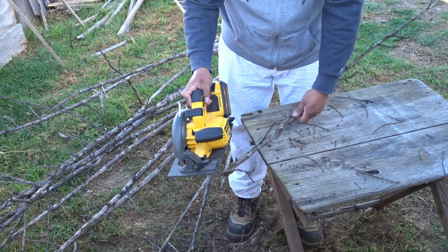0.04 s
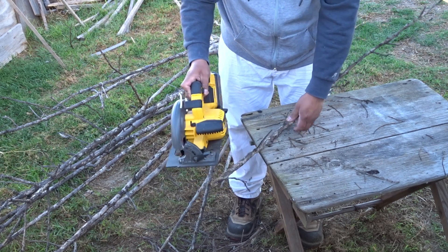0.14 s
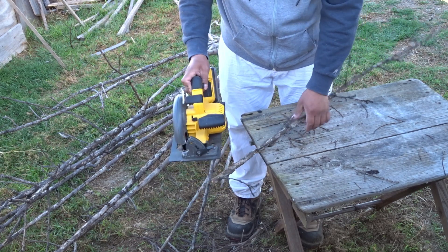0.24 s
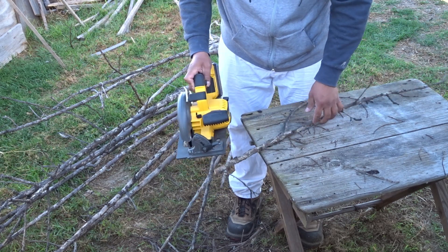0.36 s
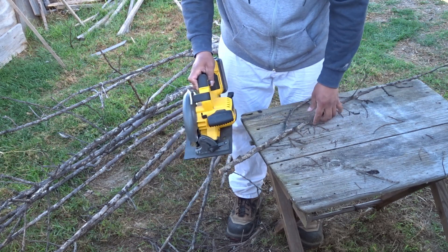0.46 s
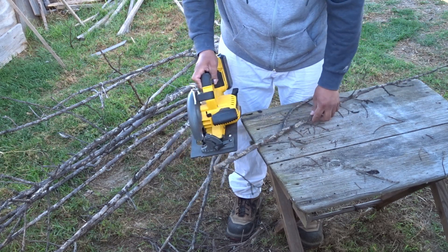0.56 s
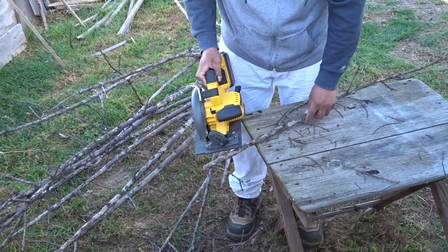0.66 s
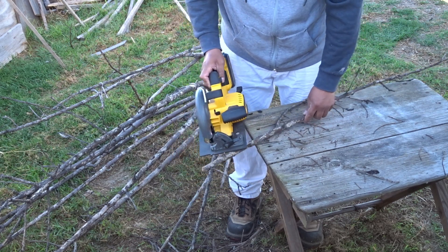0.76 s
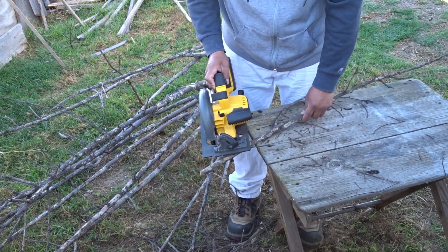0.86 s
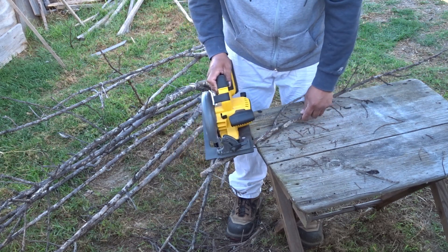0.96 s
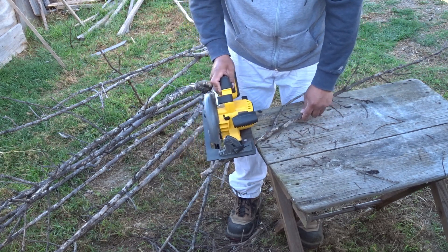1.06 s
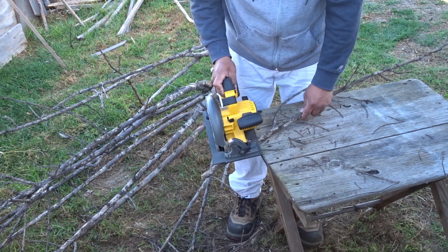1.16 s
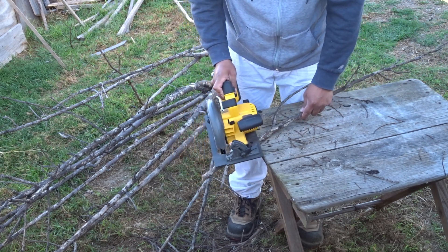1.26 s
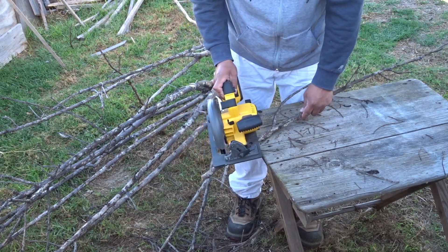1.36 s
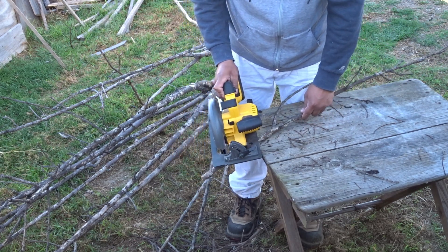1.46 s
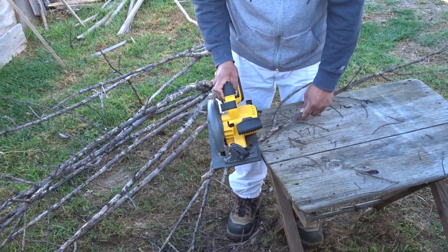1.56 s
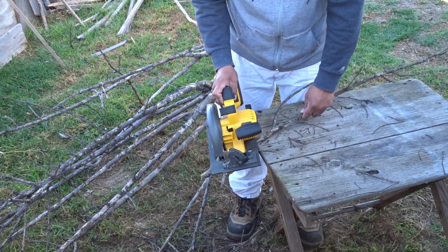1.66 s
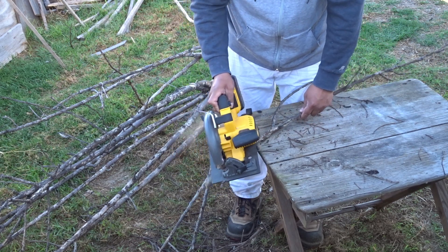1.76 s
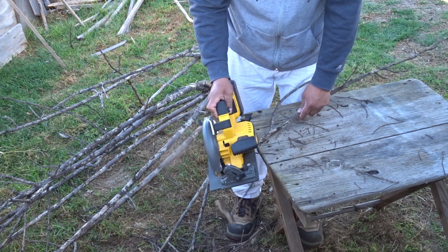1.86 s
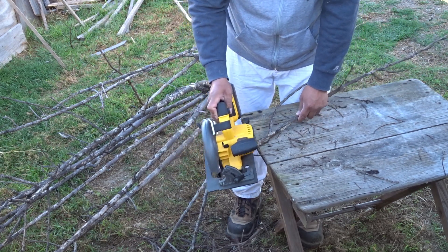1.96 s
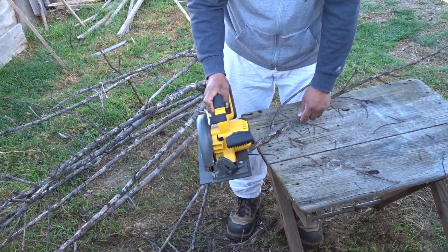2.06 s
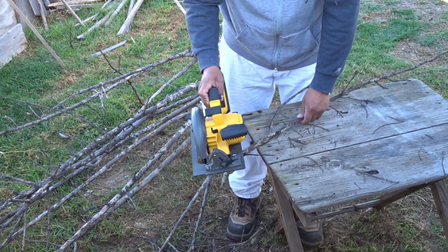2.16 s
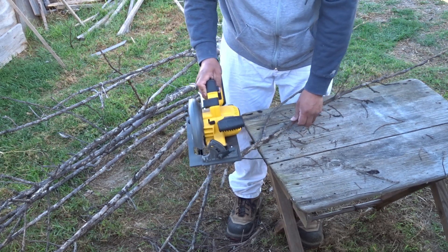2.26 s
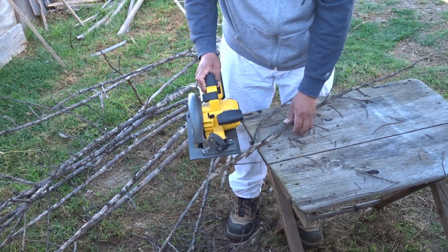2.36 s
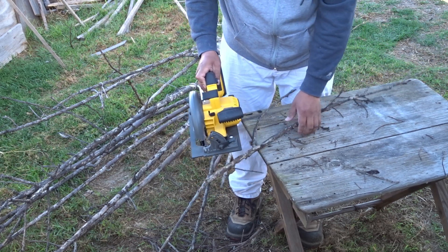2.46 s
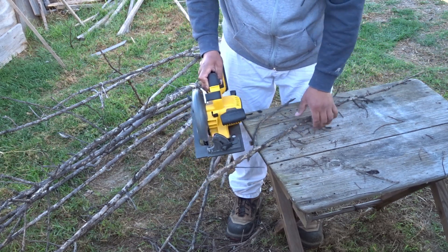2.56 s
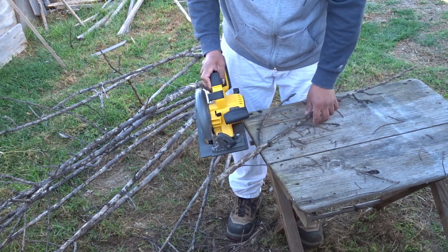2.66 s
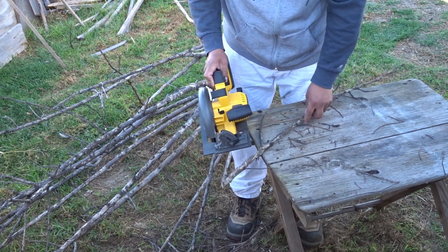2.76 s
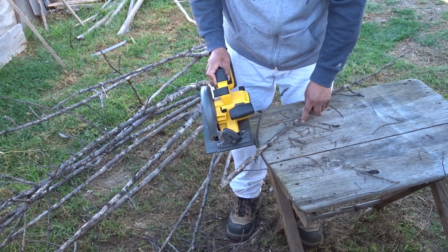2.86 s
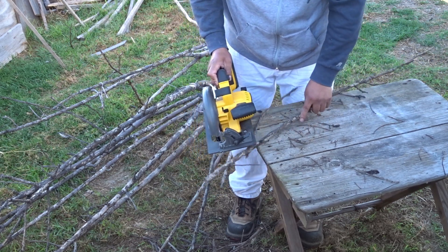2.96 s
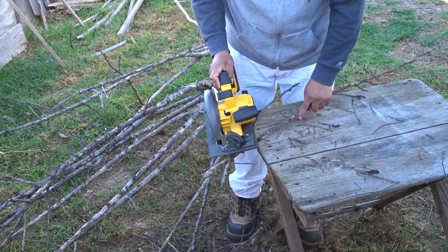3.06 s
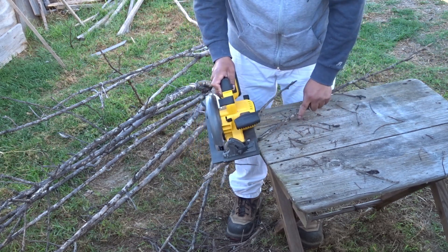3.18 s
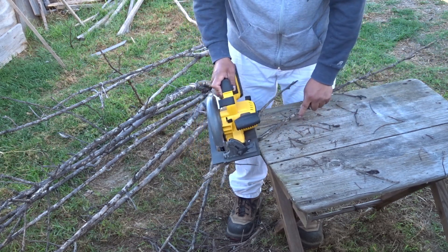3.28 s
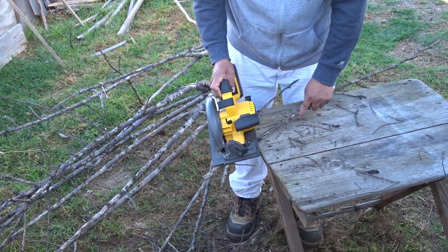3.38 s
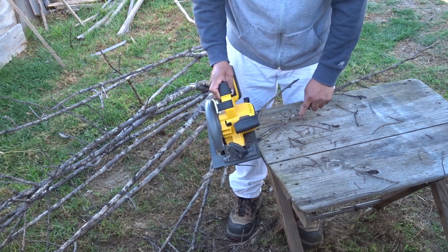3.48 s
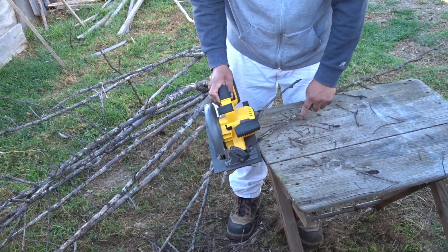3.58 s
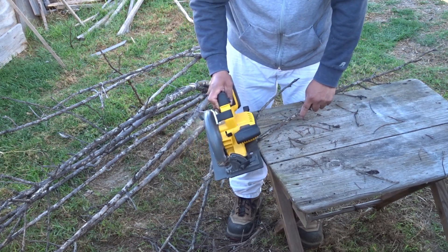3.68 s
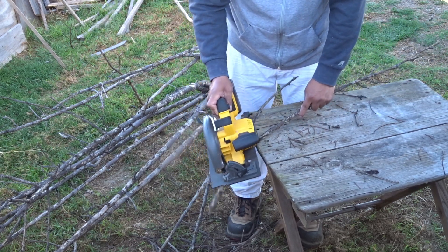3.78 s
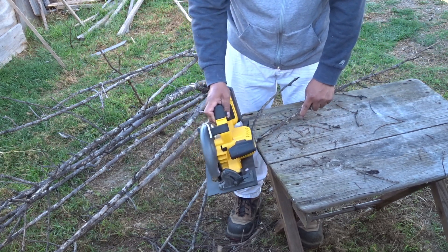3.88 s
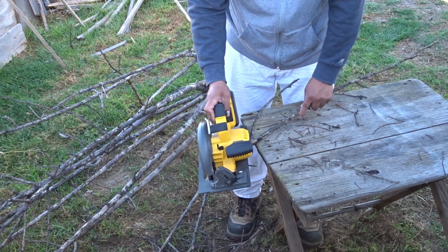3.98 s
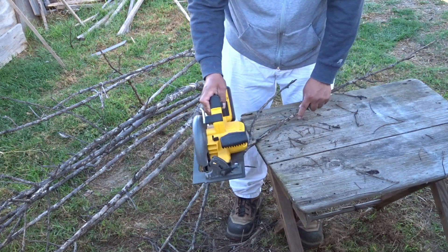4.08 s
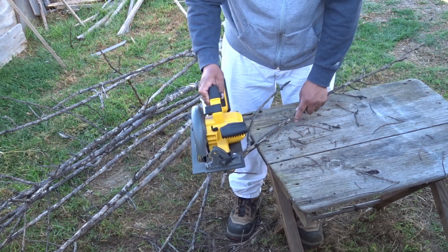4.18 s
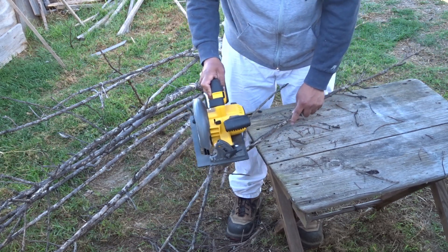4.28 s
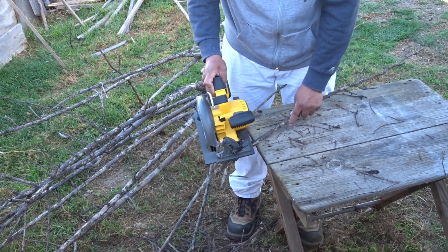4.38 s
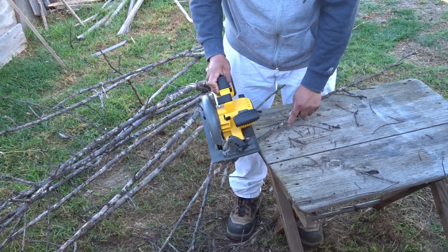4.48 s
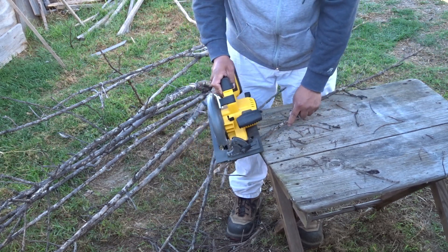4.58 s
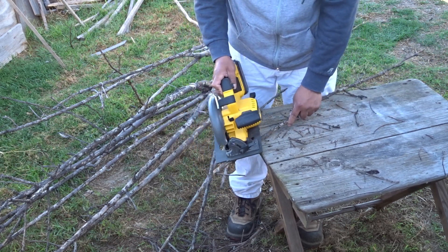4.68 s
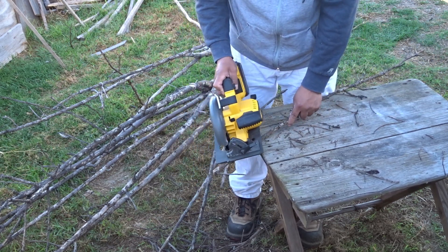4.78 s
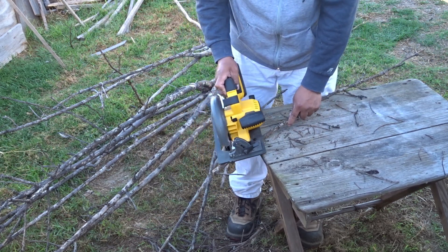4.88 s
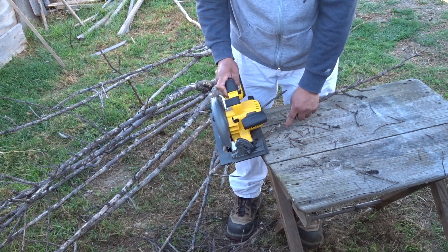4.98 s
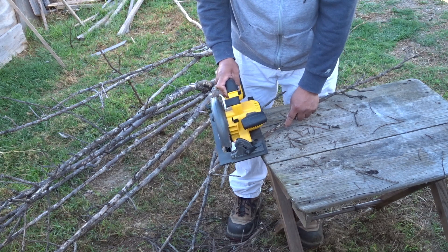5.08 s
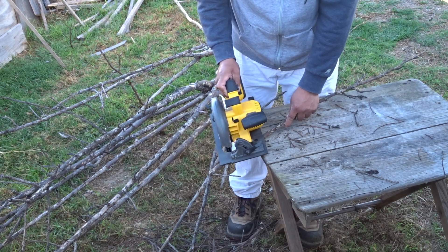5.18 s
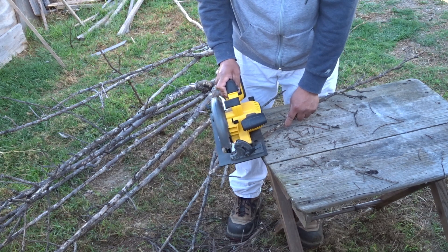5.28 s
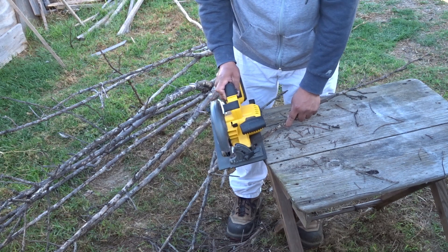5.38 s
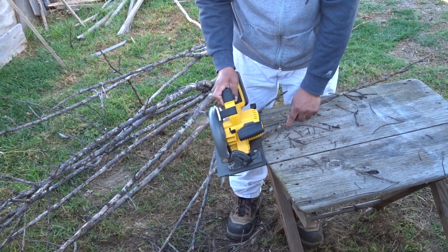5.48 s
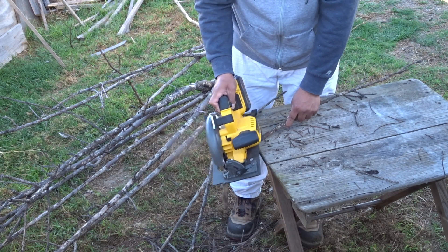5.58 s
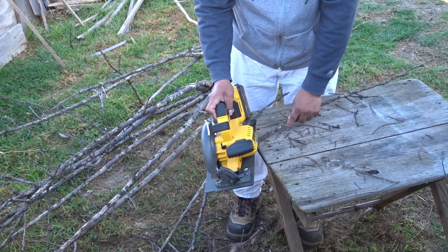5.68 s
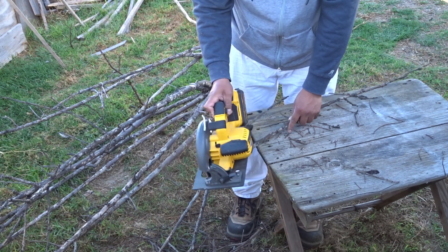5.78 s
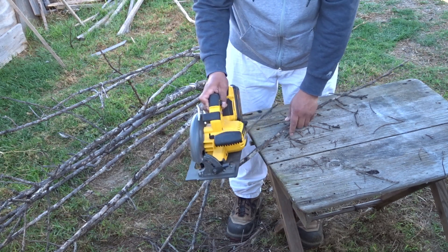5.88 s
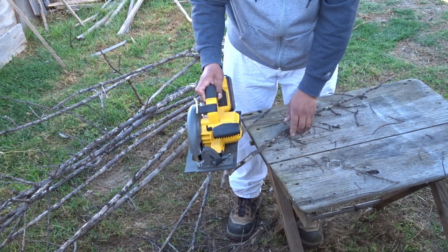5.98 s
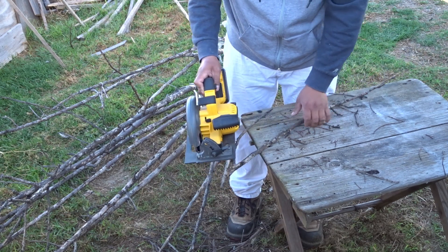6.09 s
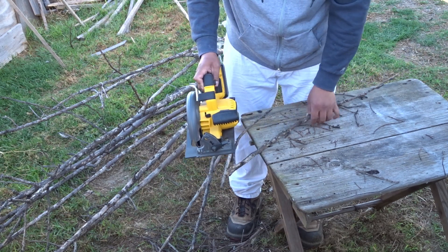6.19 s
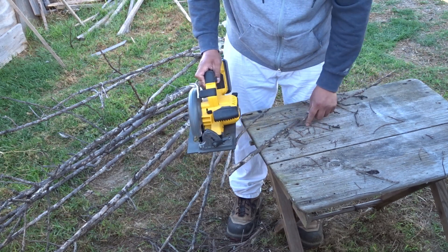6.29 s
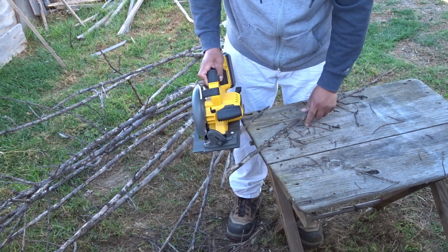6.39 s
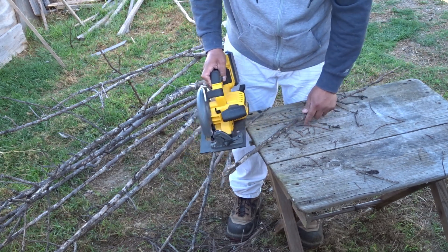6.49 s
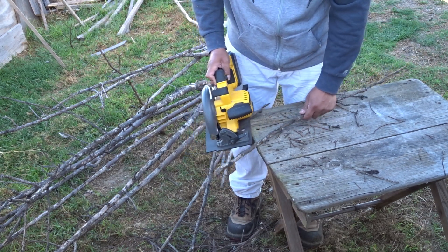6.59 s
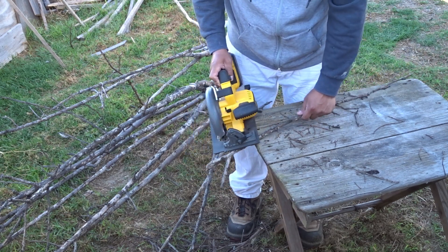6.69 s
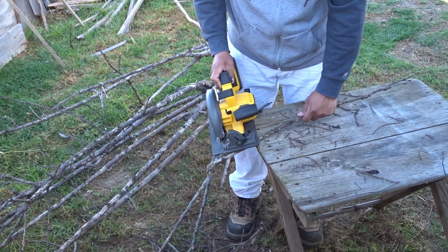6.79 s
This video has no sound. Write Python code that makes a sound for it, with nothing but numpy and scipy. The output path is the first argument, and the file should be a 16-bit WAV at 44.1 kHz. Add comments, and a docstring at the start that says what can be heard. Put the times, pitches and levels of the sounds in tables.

```python
"""A cordless circular saw whines down to a stop, and its steel blade rings on over a quiet garden. It runs up
three more times, each time nipping through a thin dry branch before the brake stops the motor. Fan and gears
whine through the housing, the gear train rattles, air rushes, teeth rasp briefly in the wood. Between runs
twigs snap, the branch is shoved over the table and squeaks once on the saw's metal guard, the switch clicks, a
distant flock chatters and one nearer bird whistles."""
import sys
import numpy as np
from scipy import signal
from scipy.fft import rfft, irfft
from scipy.io import wavfile
from scipy.ndimage import uniform_filter1d

SR = 44100
rng = np.random.default_rng(int(sys.argv[2]) if len(sys.argv) > 2 else 0)


def int16_out(signal):
    """Quantize to a 16-bit WAV file."""
    q = np.round(np.clip(np.atleast_2d(signal).T, -1, 1) * 32767)
    wavfile.write(sys.argv[1], SR, q.astype(np.int16))


N = 301644
TIME = np.arange(N) / SR

# runs of the saw, the first already braking as we come in: trigger_s, spin_up_time_constant_s, rest_s
SAW_RUNS = [(-.6, .28, .406), (1.503, .286, 2.48), (3.42, .279, 4.514), (5.199, .28, 6.315)]
# partials of the whine; near 13 is the fan, near multiples of 4 are the motor and its pinion:
# cycles_per_turn, powered_db, braking_db, loudest_shaft_hz, offset_for_6_db_drop_hz, gear_play_turns
WHINE_ORDERS = [(0.997, -4.5, 5.5, 517, 166, .002), (1.94, -31, -0.5, 574, 179, .002),
                (4.012, -15, -2, 350, 227.5, .0015), (8.03, 3, 0, 280, 69.5, 0.0011),
                (8.92, -5.5, -3.5, 203, 143.5, 0.005), (9.78, -14, -5.5, 340, 113, 0.0048),
                (11.96, -16.5, -6.5, 316, 158.5, .002), (13.03, -0.5, -0.5, 372, 152, 0.0005),
                (15.95, -10, -3.5, 226, 115.5, 0.0014), (18.05, -7, -12.5, 250, 132, .003),
                (20.16, -7.5, -16, 110, 110, .004), (26.4, -12, -11.5, 350, 108, .002),
                (27.53, -8.5, -10, 200, 109, 0.0026)]
# how well the housing radiates the whine: frequency_hz, gain_db
HOUSING_EQ = [(200, -51.5), (420, -27), (800, -11.5), (1250, -9), (1520, 4), (1920, -3), (2120, 10),
              (2480, 8.5), (2680, 2.5), (3150, 5), (3550, -1), (4050, 8.5), (4450, 2.5), (5400, 0),
              (6300, 0), (7300, 4.5), (10000, -8.5), (16000, -56)]
# tone of the gear rattle: frequency_hz, gain_db
RATTLE_EQ = [(18, -86), (30, -50.5), (276, -45), (455, -33.5), (577, -16), (1120, -9), (1420, -6.5),
             (1890, -2), (2220, 0.5), (3300, -11.5), (4650, -9), (5300, -19), (8990, -37.5), (9990, -22.5),
             (16500, -76)]
# tone of the rushing air: frequency_hz, gain_db
AIR_EQ = [(18, -78), (30, -27), (314, -31), (409, -31), (455, -24.5), (732, -29.5), (814, -12.5),
          (1270, -16), (1530, -4), (1890, -3.5), (2100, 0), (2740, -0.5), (3970, 2.5), (8310, -9),
          (16500, -36.5)]
# resonances of the spinning blade: pitch_hz, width_hz, level_db
SINGING_MODES = [(1355, 10, -4), (1650, 50, -3), (2572, 10, 3), (2637, 16, 1), (2899, 40, -2),
                 (3988, 16, -3), (6483, 16, -12), (7164, 50, -13), (8084, 14, -16), (8273, 22, -13),
                 (8741, 22, -14)]
# housing resonance where the gears grind under starting load: pitch_hz, width_hz, level_db
GRIND_MODES = [(2300, 100, -11)]
# speeds where the gears hit a housing resonance: shaft_hz, half_width_hz, powered_db, braking_db
GEAR_FLARES = [(138, 7.4, 3.5, 5), (169, 8.8, 2.5, 1), (259, 24, 5, 3.5), (299.5, 27.5, 3.5, 3)]
# tone of the open air: frequency_hz, gain_db
GARDEN_EQ = [(30, -31), (200, -35), (400, -21.5), (650, -9.5), (1000, -10), (1500, -6.5), (2500, -10),
             (3500, -2), (4500, -10), (6300, -23), (10000, -36), (16000, -51)]
# modes of the resting blade: pitch_hz, t60_s, twin_gain, stop_1_db, stop_2_db, stop_3_db, stop_4_db
BLADE_MODES = [(119, 4, .1, -89, -76, -86, -89), (1182, 3.1, 0.27, -55.5, -50.5, -104, -57),
               (1402, 3.6, .2, -77, -53, -56, -57), (1465, 6.8, 1, -51.5, -58.5, -59.5, -55),
               (1800, 0.81, .3, -44.5, -40.5, -57, -64), (2098, 7.6, 0.058, -57, -37.5, -50, -49.5),
               (3090, 4.3, 0.36, -40.5, -48.5, -44, -51.5), (3305, 3.1, 0.34, -65.5, -48, -63, -47),
               (3765, 3.3, 0.76, -52, -35.5, -50, -47.5), (3947, 2.5, 0.15, -46, -46.5, -52, -50.5),
               (4960, 1.9, 0.38, -55, -60.5, -49.5, -51), (6680, 0.56, 0.36, -52.5, -52, -56, -56),
               (2412, 1.5, .3, -54, -58, -64, -47), (8100, .7, .4, -72, -63, -72, -69)]
# tone of cracking dry wood: frequency_hz, gain_db
CRACK_EQ = [(100, -66), (350, -11), (1200, -5), (2500, -1.5), (4000, 3.5), (7000, -6), (10000, -11),
            (16000, -34)]
# twigs snapping: start_s, peak_db, t60_s
TWIG_SNAPS = [(.412, -29, .025), (.454, -29, .018), (2.682, -29, .022), (2.964, -31, .027),
              (5.004, -38, .029), (6.553, -30, .03), (6.626, -29, .04), (6.757, -30, .023),
              (2.604, -16, .024), (2.89, -14, .022)]
# short drags of the branch over the table: peak_s, level_db, t60_s
BRANCH_SHOVES = [(.87, -64, .3), (1.06, -63, .6), (1.35, -63, .4), (2.66, -40.5, 0.5), (2.76, -53, 0.49),
                 (2.98, -46.5, 0.35), (4.6, -53.5, 0.51), (6.62, -50.5, .7)]
# bouts of chatter from the flock: middle_s, half_length_s, level_db
FLOCK_BOUTS = [(1.047, 0.14, -52.5), (1.433, 0.15, -47.5), (3.174, 0.14, -49), (4.792, 0.11, -49.5),
               (6.8, 0.25, -56)]
# switch clicks and knocks of gears and guard: start_s, peak_db, crack_db, t60_s
SAW_KNOCKS = [(1.24, -29, -30, .07), (1.451, -20, -18, .03), (3.366, -19, -26, .035),
              (5.145, -23, -16, .03), (6.608, -26, -22, .06), (1.489, -20, -20, .06),
              (1.537, -17, -20, .035), (3.413, -22, -20, .04), (3.449, -20, -16, .04),
              (3.485, -16, -8, .035), (4.562, -10, 6, .028), (4.567, -13, -3, .026), (5.197, -23, -20, .04),
              (5.228, -10, -14, .03)]
# resonances of the knocked saw body: pitch_hz, width_hz, level_db
BODY_MODES = [(1620, 50, -4.5), (2310, 1140, 5.5), (3440, 590, -10.5), (4600, 230, -51), (6100, 710, -77)]
# resonances of the metal guard: pitch_hz, width_hz, level_db
GUARD_MODES = [(2180, 70, 0), (3630, 200, -12), (4330, 80, -5), (5700, 500, -17), (8040, 500, -19)]
# the blade passes through a branch: start_s, end_s, level_db
BRANCH_CUTS = [(1.734, 1.86, 2), (3.658, 3.768, 3.5), (5.455, 5.572, 0.5)]
# tone of the teeth tearing wood: frequency_hz, gain_db
RASP_EQ = [(200, -47), (480, -52), (600, -37.5), (720, -11), (1200, -15), (1700, -1.5), (2100, 0),
           (2600, 7.5), (3000, -4), (5000, 0), (8500, 0), (11000, -7), (16500, -21.5)]
# tones of the teeth striking wood: tooth_rate_multiple, level_db
TOOTH_TONES = [(1, -24.5), (2, -17.5), (3, -4)]
# distant surfaces return less bass and treble: frequency_hz, gain_db
ECHO_EQ = [(300, -2), (1000, 1.5), (4000, -6), (14000, -12.5)]
# stereo width, as the tone of the side signal: frequency_hz, gain_db
SIDE_EQ = [(60, -3.5), (250, -9), (500, -14.5), (1000, -14.5), (2200, -11), (4000, -7), (8000, -3.5),
           (13000, -7.5)]

FULL_HZ = 400  # shaft speed that counts as full speed


def undb(db):
    """Decibels to gain."""
    return 10 ** (np.asarray(db) / 20)


def unit(x):
    """Scale to rms 1."""
    return x / np.sqrt(np.mean(x ** 2) + 1e-18)


def noise():
    """White noise."""
    return rng.standard_normal(N)


def drift(rate_hz):
    """Random wander that glides to a new value rate_hz times a second."""
    return 1.6 * np.interp(TIME * rate_hz, np.arange(N), noise())


def gain_at(hz, eq):
    """Gain of an EQ curve at the given frequencies."""
    points_hz, db = np.transpose(eq)
    return undb(np.interp(np.log(hz + 1), np.log(points_hz), db))


def colour(x, eq):
    """Filter through an EQ curve."""
    size = 2 ** 19
    return irfft(rfft(x, size) * gain_at(np.fft.rfftfreq(size, 1 / SR), eq))[:N]


def resonate(x, modes):
    """Parallel resonances, each at its own rms level."""
    return sum(undb(db) * unit(signal.lfilter(*signal.iirpeak(hz, hz / width, SR), x))
               for hz, width, db in modes)


def grains(per_s, spread_db):
    """Random tiny impacts of uneven size."""
    hits = rng.random(N) < per_s / SR
    return unit(hits * noise() * undb(spread_db * np.clip(noise(), -2, 2)))


def fade(start, t60):
    """Gain 1 until the start time, then a steady decay."""
    return undb(-60 * np.maximum(TIME - start, 0) / t60)


def swell(peak, rise_s):
    """Gain that climbs 60 dB in the rise time and holds at 1 from the peak on."""
    return undb(-60 * np.maximum(peak - TIME, 0) / rise_s)


def burst(x, start, t60):
    """A fast-dying piece of x with peak 1; small things radiate no bass."""
    first = int(start * SR)
    piece = x[first:first + SR // 4]
    age = np.arange(len(piece)) / SR
    piece = piece * undb(-60 * age / t60) * np.minimum(age / .0005, 1)
    piece = signal.sosfilt(signal.butter(4, 750, "high", fs=SR, output="sos"), piece)
    return np.pad(piece / np.abs(piece).max(), (first, N - first - len(piece)))


def shaft_speed():
    """The motor climbs towards its free speed, the brake pulls it down, friction takes the last bit."""
    free_hz, brake_hz_per_s, friction_hz, friction_s = 461, 509.6, 125.2, .099
    hz = np.zeros(N)
    for start, spin_up, rest in SAW_RUNS:
        driven = free_hz * np.tanh(np.maximum(TIME - start, 0) / spin_up)
        left_s = np.maximum(rest - TIME, 0)
        braked = brake_hz_per_s * left_s + friction_hz * (1 - np.exp(-left_s / friction_s))
        hz += np.minimum(driven, braked)
    return hz


def whine(hz, turns, powered):
    """Shaft orders sweep through the housing resonances; braking loads the other tooth flank."""
    out = 0
    judder = drift(220) * (1 + powered)  # gear play shakes the phase, more so under power
    for order, power_db, brake_db, best_hz, spread_hz, play in WHINE_ORDERS:
        db = brake_db + (power_db - brake_db) * powered - 6 * ((hz - best_hz) / spread_hz) ** 2
        shake_db = (2.1 + powered) * drift(130) + .99 * drift(25)
        tone = np.sin(2 * np.pi * order * (turns + play * judder))
        out += undb(db + shake_db) * gain_at(order * hz, HOUSING_EQ) * tone
    return out


def saw_loudness(hz, powered):
    """The saw grows louder with speed, flares where gears hit a resonance, and settles after the stop."""
    full_db, starting_db, stopping_db = -16, -30, -42
    slow = undb(stopping_db + (starting_db - stopping_db) * powered)
    flare_db = sum((brake_db + (power_db - brake_db) * powered) * np.exp(-((hz - at_hz) / width) ** 2)
                   for at_hz, width, power_db, brake_db in GEAR_FLARES)
    running = sum((TIME > start) * fade(rest, t60=.35) for start, _, rest in SAW_RUNS)
    return running * (slow + (undb(full_db) - slow) * hz / FULL_HZ) * undb(flare_db)


def saw():
    """Rattle leads at low speed, whine in between, rushing air and the singing blade at full speed."""
    hz = shaft_speed()
    turns, speed = np.cumsum(hz) / SR, hz / FULL_HZ
    angle = 2 * np.pi * turns
    powered = uniform_filter1d(1. * (np.gradient(hz) > 0), size=1500)  # 1 on the trigger, 0 on the brake
    lash = 1 + .067 * np.cos(angle) + .13 * np.cos(4 * angle)
    rattle = unit(colour(grains(5000, spread_db=1.36) * lash, RATTLE_EQ)) * undb(drift(90))
    air = unit(colour(noise() * (1 + .17 * np.cos(angle)), AIR_EQ)) * undb(.78 * drift(40))
    singing = unit(resonate(noise(), SINGING_MODES)) * (.28 + .67 * powered)
    mix = undb(-13.5) * rattle + speed ** 1.515 * air + undb(-5) * speed ** 3 * singing
    mix += undb(-5.5) * speed ** .32 * whine(hz, turns, powered) + cutting(turns)
    grind = resonate(colour(noise(), RATTLE_EQ), GRIND_MODES)
    mix += grind * powered * np.exp(-(hz / 110) ** 2)  # only while the motor labours up from rest
    # the layers share one loudness, so the rasp of a cut pushes the whine back
    mix /= np.sqrt(uniform_filter1d(mix ** 2, size=900) + 1e-12)
    return mix * saw_loudness(hz, powered)


def garden_air():
    """A quiet bed of open air, gently wavering."""
    return unit(colour(noise(), GARDEN_EQ)) * undb(-53.5 + .59 * drift(4.7))


def blade_ring():
    """The steel disc rings on after each stop; its modes come in close pairs that beat."""
    twin_ratio, onset_s = 1.002, .057
    out = 0
    for hz, t60, twin_gain, *stop_levels in BLADE_MODES:
        twin = np.sin(2 * np.pi * (hz * twin_ratio * TIME + rng.random()))
        pair = np.sin(2 * np.pi * hz * TIME) + twin_gain * twin
        for (_, _, stop), db in zip(SAW_RUNS, stop_levels):
            age = TIME - stop
            out += pair * undb(db - 60 * np.abs(age) / t60) * np.clip(1 + age / onset_s, 0, 1)
    return out


def branch():
    """Dry twigs snap and bark crackles over the table."""
    crack = colour(noise(), CRACK_EQ)
    snaps = sum(undb(db) * burst(crack, start, t60) for start, db, t60 in TWIG_SNAPS)
    shoves = sum(undb(db) * swell(peak, rise_s=.18) * fade(peak, t60) for peak, db, t60 in BRANCH_SHOVES)
    bark = unit(colour(grains(1100, spread_db=3.1), CRACK_EQ))
    return snaps + bark * shoves * undb(.6 * drift(35))


def flock():
    """Twelve birds chatter in bouts, blurred by distance."""
    voices = 0
    for _ in range(12):
        pitch_hz = 3850 + 650 * np.tanh(drift(14)) + 280 * drift(1500)
        voices += np.sin(2 * np.pi * np.cumsum(pitch_hz) / SR) * undb(2.6 * drift(8.2))
    bouts = sum(undb(db) * np.exp(-((TIME - middle) / half) ** 2) for middle, half, db in FLOCK_BOUTS)
    return unit(voices) * bouts


def knocks():
    """Hard little blows of switch, gears and guard ring the saw body, each with a bright crack."""
    lowpass = signal.butter(3, 6500, fs=SR, output="sos")
    body = unit(signal.sosfilt(lowpass, resonate(noise(), BODY_MODES)))
    crack = unit(colour(noise(), CRACK_EQ))
    return sum(undb(db) * burst(body + undb(crack_db) * crack, start, t60)
               for start, db, crack_db, t60 in SAW_KNOCKS)


def squeak():
    """Wood rubs harder and harder on the metal guard, then slips off and lets it ring out."""
    grab_s, slip_s, grab_db, slip_db = 1.266, 1.28, -22.5, -18
    ring = unit(resonate(noise(), GUARD_MODES))
    ring /= np.sqrt(uniform_filter1d(ring ** 2, size=200))  # even out into a steady squeal
    scrape = undb(-13) * unit(colour(noise(), CRACK_EQ))
    rub = signal.sosfilt(signal.butter(6, 9500, fs=SR, output="sos"), ring + scrape)
    grip = (TIME > grab_s) * undb(np.interp(TIME, [grab_s, slip_s], [grab_db, slip_db]))
    release = fade(slip_s, t60=.038) + undb(-26) * fade(slip_s, t60=.086)
    return rub * grip * release


def bird_whistle():
    """One nearer bird whistles a thin arch, loudest at its top."""
    middle_s, half_length_s, top_hz, drop_hz = 1.455, .046, 5950, 1310
    arch = np.minimum(((TIME - middle_s) / half_length_s) ** 2, 4)
    pitch_hz = top_hz - drop_hz * arch + 120 * drift(890)
    return undb(-48) * np.sin(2 * np.pi * np.cumsum(pitch_hz) / SR) * np.exp(-arch ** 2)


def cutting(turns):
    """Each tooth tears out chips and knocks the branch."""
    teeth_per_shaft_turn = 1.66
    tooth_phase = 2 * np.pi * (teeth_per_shaft_turn * turns + .022 * drift(150))
    chips = unit(colour(grains(9000, spread_db=.48) * (1 + .5 * np.cos(tooth_phase)), RASP_EQ))
    tones = sum(undb(db) * np.sin(multiple * tooth_phase) for multiple, db in TOOTH_TONES)
    bite = sum(undb(db) * np.interp(TIME, [on - .01, on + .018, off - .025, off + .0067], [0, 1, 1, 0])
               for on, off, db in BRANCH_CUTS)
    return bite * (chips + tones * undb(2 * drift(60)))


def reflections(x, t60):
    """A dense scatter off table, ground and fence."""
    age = np.arange(SR // 2) / SR
    response = rng.standard_normal(len(age)) * undb(-60 * age / t60) * (age > .001)
    return signal.fftconvolve(x, response / np.linalg.norm(response))[:N]


def scene():
    """The saw sits dead centre; its turbulence, near reflections and the garden give the width."""
    details = blade_ring() + knocks() + branch() + squeak() + bird_whistle()
    direct = saw() + details
    echo = colour(reflections(direct, t60=.2), ECHO_EQ)
    mid = direct + undb(-6) * echo + garden_air() + flock()
    early = reflections(saw() + details, t60=.018)  # the same runs with fresh turbulence
    side = colour(early + garden_air() + flock(), SIDE_EQ)
    return np.array([(mid + side) * undb(-2.5), (mid - side) * undb(-2.15)])


def record(dry):
    """Round off the highest peaks and cut the very top of the treble."""
    ceiling, top_hz = .52, 16600
    rounded = dry / (1 + (dry / ceiling) ** 6) ** (1 / 6)
    return signal.sosfilt(signal.ellip(10, .2, 70, top_hz, fs=SR, output="sos"), rounded)


dry = scene()
out = record(dry)
int16_out(out)
```